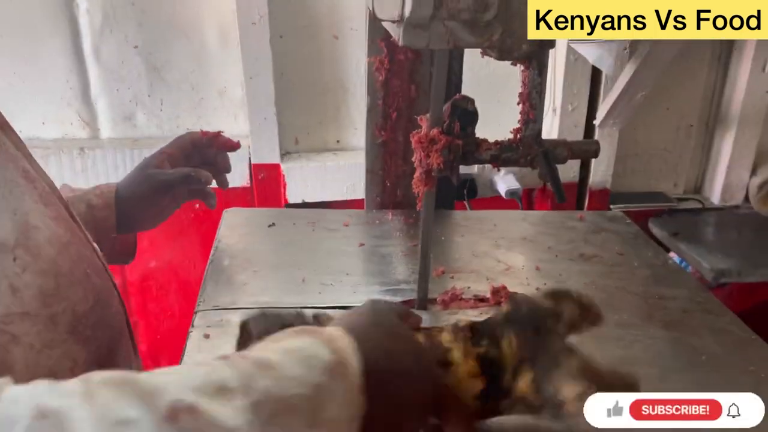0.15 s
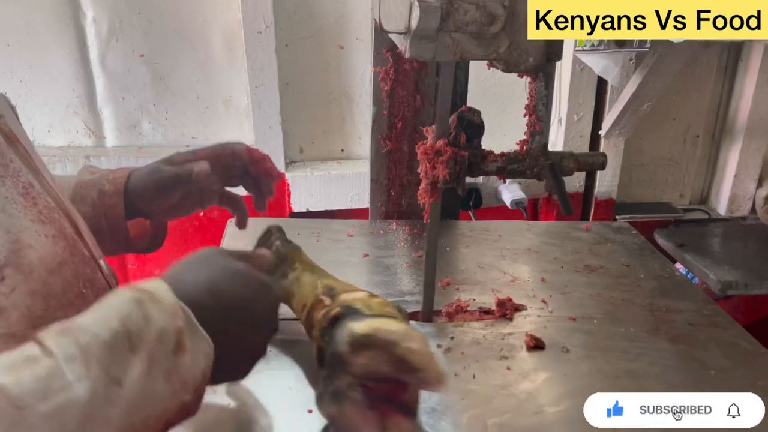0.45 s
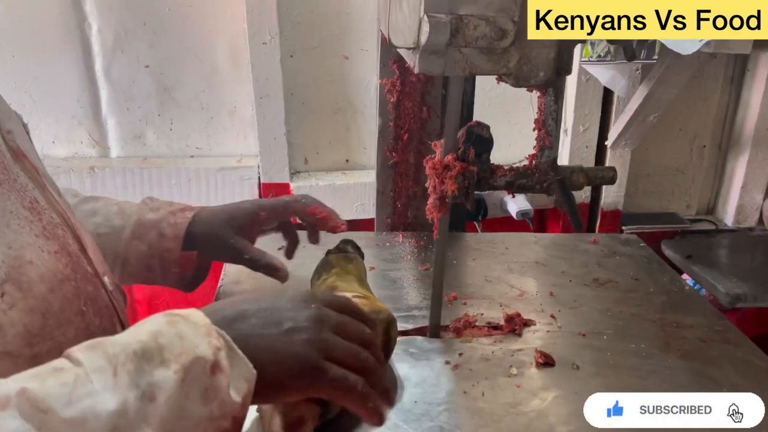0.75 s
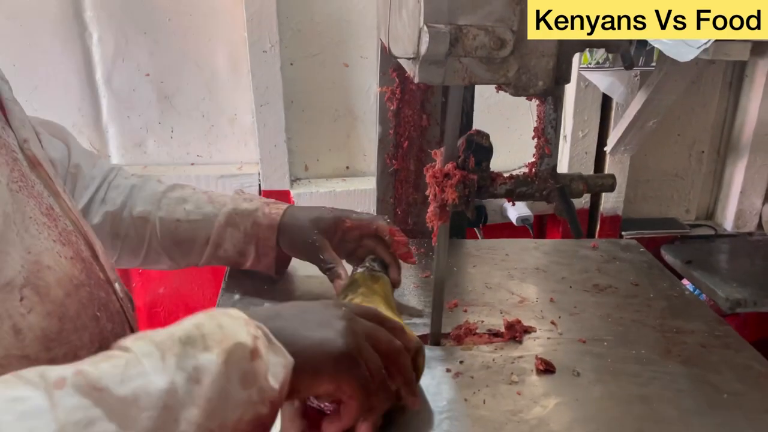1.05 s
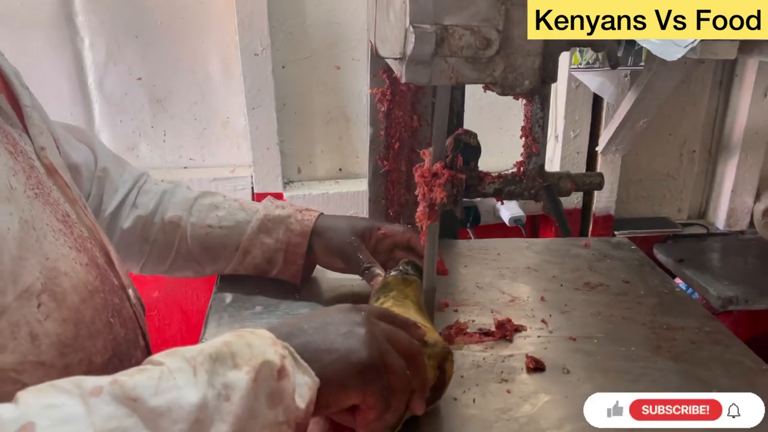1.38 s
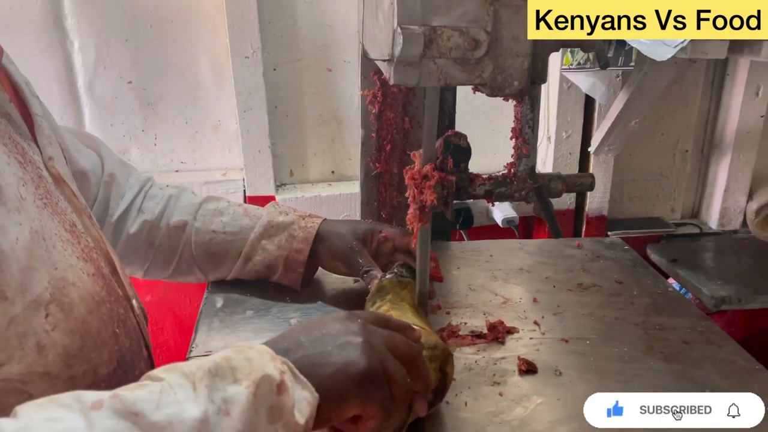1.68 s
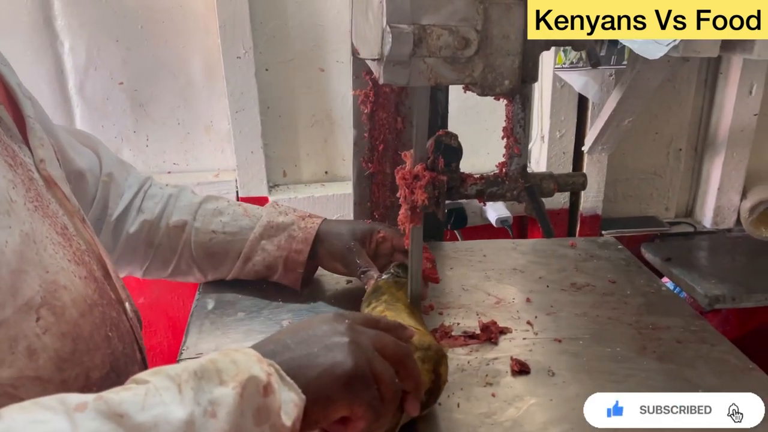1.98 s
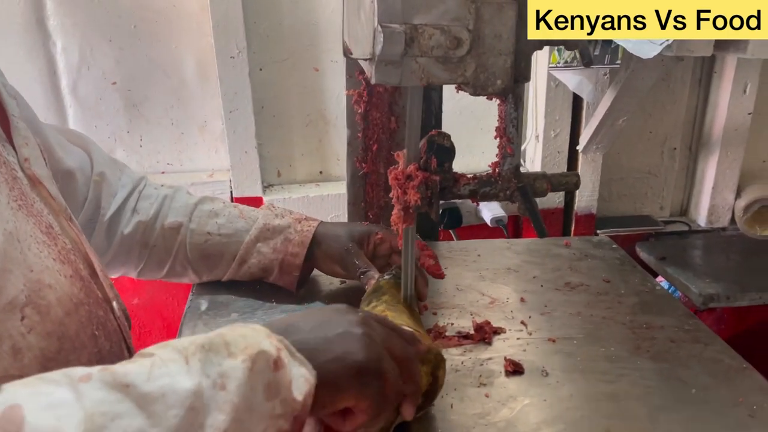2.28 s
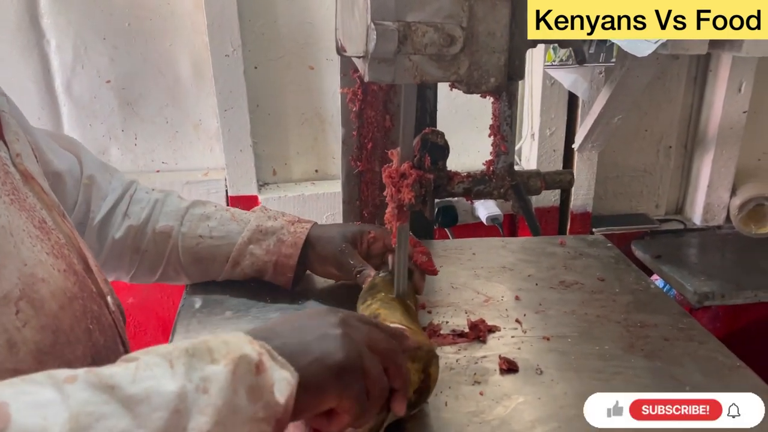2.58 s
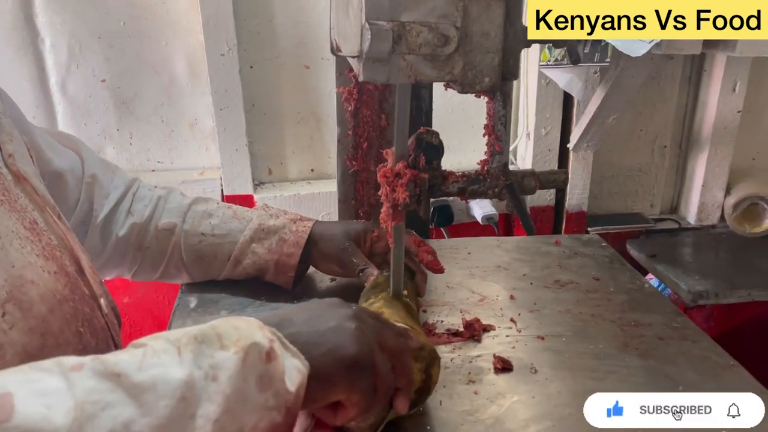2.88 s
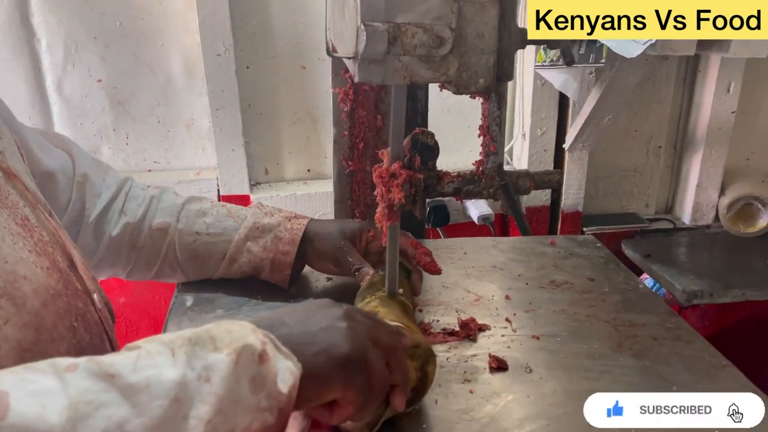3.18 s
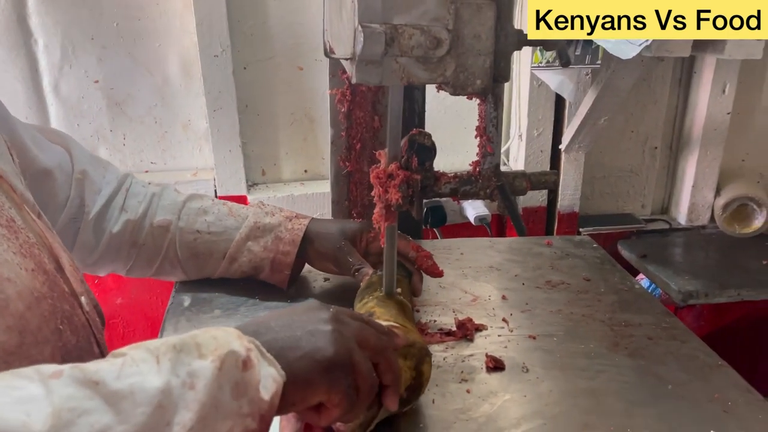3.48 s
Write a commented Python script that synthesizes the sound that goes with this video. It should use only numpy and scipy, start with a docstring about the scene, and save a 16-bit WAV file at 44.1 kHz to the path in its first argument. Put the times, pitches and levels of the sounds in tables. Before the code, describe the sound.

A band saw hums, a meat joint knocks on the steel table, then teeth grind bone

```python
"""Band saw cutting a joint of meat

A butcher's band saw idles in a tiled workshop: steady tones hum, noise through resonances makes the steel
frame rumble, shaped noise whirrs, narrow rings rattle in the guides and tiny clicks sizzle.
A joint knocks on the table, which rings as decaying tones, and is then pushed into the blade:
the teeth sing as an unsteady tone near 900 Hz, dense clicks grind the bone, and resonant noise squeals."""
import sys
import numpy as np
from scipy import signal
from scipy.fft import rfft, irfft
from scipy.io import wavfile

SR = 44100
rng = np.random.default_rng(int(sys.argv[2]) if len(sys.argv) > 2 else 0)


def file_out(sig):
    """Save sig as 16-bit WAV at sys.argv[1]."""
    # one column per channel
    cols = np.atleast_2d(sig).T
    # limit, then scale
    lim = np.clip(cols, -1, 1)
    pcm = np.round(lim * 32767).astype(np.int16)
    wavfile.write(sys.argv[1], SR, pcm)


N = 160965          # length in samples
TOUCH_S = 1.335     # the blade meets the bone


def from_db(db):
    """Turn decibels into a factor for the wave."""
    return 10 ** (np.asarray(db) / 20)


def rms_one(x):
    """Scale a signal to an average strength (RMS) of 1."""
    return x / np.sqrt(np.mean(x ** 2) + 1e-20)


def in_time(rows):
    """Read each column at every sample, with straight lines between the rows."""
    start_s, *columns = np.transpose(rows)
    time_s = np.arange(N) / SR
    return [np.interp(time_s, start_s, column) for column in columns]


def at_hz(rows):
    """Read each column at every FFT bin, on a log frequency axis."""
    pitch_hz, *columns = np.transpose(rows)
    bin_hz = np.arange(N // 2 + 1) * SR / N
    # the extra 1 Hz avoids the log of zero
    return [np.interp(np.log(bin_hz + 1), np.log(pitch_hz), column) for column in columns]


def drift(rate_hz):
    """Slow random wandering of RMS 1, made at every 20th sample by smoothing noise twice."""
    r = np.exp(-2 * np.pi * rate_hz * 20 / SR)
    noise = rng.standard_normal(N // 20 + 3002)
    slow = signal.lfilter([1], [1, -2 * r, r * r], noise)[3000:]  # drop the filter's start
    return np.interp(np.arange(N) / 20, np.arange(len(slow)), rms_one(slow))


def colour(x, spectrum):
    """Shape the spectrum of a signal by a table of levels, then set its RMS to 1."""
    gain = from_db(at_hz(spectrum)[0])
    return rms_one(irfft(rfft(x) * gain, N))


def resonate(peaks, patchy_db):
    """Noise passes twice through each resonance, and each swells on its own."""
    out = 0
    for pitch_hz, width_hz, level_db in peaks:
        r = np.exp(-1.5 * np.pi * width_hz / SR)
        w = 2 * np.pi * pitch_hz / SR
        stage = [(1 - r * r) / 2, 0, (r * r - 1) / 2, 1, -2 * r * np.cos(w), r * r]
        noise = rng.standard_normal((2, N + SR // 4))  # a quarter second to build up, cut off below
        ringing = signal.sosfilt([stage] * 2, noise)[:, -N:]
        out = out + from_db(level_db + patchy_db * drift(5.5)) * ringing
    return rms_one(out)


def grains(per_s, spread_db):
    """Clicks of uneven size and random sign at random moments, shared by both sides."""
    size_db = spread_db * np.minimum(rng.exponential(1, (2, N)), 5)
    sizes = from_db(size_db) * rng.choice([-1, 1], (2, N))
    return sizes * (rng.random(N) < per_s / SR)


def motor_hum(hum_db):
    """The motor hums in steady sine tones that share one changing level."""
    # the hum's tones: pitch_hz [Hz], level_db [dB]
    hum_tones = [(100.6, -2.5), (301.8, -15.5)]
    t = np.arange(N) / SR
    hum = 0
    for pitch_hz, level_db in hum_tones:
        sine = np.sin(2 * np.pi * (pitch_hz * t + rng.random()))
        hum = hum + from_db(level_db + hum_db) * np.sqrt(2) * sine
    return hum


def frame_rumble(swing_db):
    """Noise shakes the resonances of the steel frame and table, swinging along with the hum."""
    # resonances: pitch_hz [Hz], width_hz [Hz], level_db [dB, relative]
    frame = [(67.3, 20.4, 2), (133.9, 8, -2.5), (203, 8.2, -11.5), (231, 4.6, 3.5), (253, 10.2, 2.5),
             (290, 23.4, 5), (305.5, 70, -8.5), (361, 29, -11), (407.3, 19.5, -4), (525, 5.9, -0.5),
             (656.5, 42, -8), (841.5, 39, -13.5), (895.4, 10.8, -1.5), (1217, 8.3, -4.5)]
    rumble_db, follows = -25.5, 1  # level in dB at zero swing; share of the hum's swing
    return from_db(rumble_db + follows * swing_db) * resonate(frame, patchy_db=0.8)


def blade_whirr(swing_db):
    """Wheels and blade whirr as shaped noise; dense tiny clicks add a thin sizzle."""
    # whirr of wheels and blade in the guides: pitch_hz [Hz], level_db [dB per Hz, relative]
    whirr_spectrum = [(40, 0.5), (170, -12), (450, -1.5), (1000, -6.5), (1900, -10), (2850, -17.5),
                      (3400, -18), (6000, -19.5), (7300, -23), (9300, -21.5), (12000, -35)]
    # thin sizzle on top: pitch_hz [Hz], level_db [dB per Hz, relative]
    sizzle_spectrum = [(3000, -48), (7300, -21), (9300, -4), (11100, 4), (12100, -3.5), (13000, -43),
                       (13600, -36), (14500, -45)]
    # sizzle before the cut, at zero swing: start_s [s], level_db [dB]
    idle_sizzle = [(0, -36), (.07, -39), (.2, -40), (.35, -43), (.52, -39), (.65, -36.5), (.88, -35.5),
                   (.95, -38.5), (1.1, -39), (1.36, -40)]
    whirr_db, follows = -27.5, 0.76  # level in dB at zero swing; share of the hum's swing
    noise = rng.standard_normal((2, N)) * from_db(0.7 * drift(9))
    whirr = from_db(whirr_db) * colour(noise, whirr_spectrum)
    clicks = grains(per_s=2300, spread_db=3.0) * from_db(1.4 * drift(31))
    sizzle = from_db(in_time(idle_sizzle)[0]) * colour(clicks, sizzle_spectrum)
    return from_db(follows * swing_db) * (whirr + sizzle)


def blade_whine():
    """The free-running blade whines in one narrow resonance, which fades out just before the bone."""
    whine_hz, width_hz = 3445, 26
    start_db, fade_db_per_s = -45.5, 1.5
    t = np.arange(N) / SR
    free = np.clip((TOUCH_S - t) / 0.054, 0, 1)  # fades over the last 54 ms before the touch
    level = from_db(start_db - fade_db_per_s * t)
    return level * free * resonate([(whine_hz, width_hz, 0)], patchy_db=1.3)


def guides():
    """The blade rattles in its guides: narrow rings that wander in pitch and flicker in level."""
    # rings: pitch_hz [Hz], level_db [dB, relative]
    rings = [(1820, -3), (2010, 3), (2480, -8)]
    # level while the blade runs free: start_s [s], level_db [dB]
    ring_level = [(0, -56), (.3, -39), (.6, -46), (.74, -40), (.88, -45), (1.12, -35), (1.3, -39),
                  (1.4, -64)]
    wander, rattle_db = 0.027, 2  # spread as a share of pitch; spread in dB
    out = 0
    for pitch_hz, level_db in rings:
        phase = 2 * np.pi * np.cumsum(pitch_hz * (1 + wander * drift(1.8))) / SR
        level = from_db(level_db + rattle_db * drift(11))
        # random sine and cosine amounts give each side its own narrow band of noise
        sides = [drift(40) * np.sin(phase) + drift(38) * np.cos(phase) for side in range(2)]
        out = out + level * np.array(sides)
    return from_db(in_time(ring_level)[0]) * rms_one(out)


def idling():
    """Motor, frame, blade and guides together; rumble, whirr and sizzle swing with the hum."""
    # level of the hum, which sinks once the cut has begun: start_s [s], level_db [dB]
    idle_level = [(0.0, -30.5), (0.03, -31.5), (0.59, -29.5), (0.66, -30), (1.33, -27.5), (1.73, -40),
                  (2.68, -39.5), (3.2, -39.5), (3.65, -37.5)]
    hum_db, = in_time(idle_level)
    swing_db = hum_db + 31  # zero at a hum of -31 dB
    return (motor_hum(hum_db) + frame_rumble(swing_db) + blade_whirr(swing_db)
            + blade_whine() + guides())


def knocks():
    """The joint knocks on the steel table; each blow starts decaying tones, softened by a low-pass."""
    # blows: start_s [s], level_db [dB], hard_db [extra dB of the modes above hard_hz]
    blows = [(0.433, -22, -7), (0.505, -32, 20), (0.509, -29, 15), (0.515, -8.5, 1), (0.532, -20, 9.5),
             (0.554, -13.5, -6), (0.623, -14.5, -5), (1.412, -14.5, -1), (1.442, -22, 19)]
    # ringing modes: pitch_hz [Hz], level_db [dB, relative], t60_s [s to fall by 60 dB]
    table_modes = [(74, 2, 0.13), (238.7, -5, 0.15), (300, -8, 0.12), (538, -13, 0.12), (764, -11, 0.04),
                   (1240, -8, 0.022), (1890, -9, 0.012), (2450, -10, 0.01)]
    hard_hz, contact_hz = 700, 1200  # upper modes start here; low-pass of the soft contact
    spread_db = 1.2  # chance in each mode, blow and side
    start_s, blow_db, hard_db = np.transpose(blows)
    at = (start_s * SR).astype(int)
    out = 0
    for pitch_hz, level_db, t60_s in table_modes:
        chance_db = rng.normal(0, spread_db, (len(at), 2)).T
        clicks = np.full((2, N), 1e-18)  # inaudible, keeps the filter away from tiny numbers
        clicks[:, at] = from_db(blow_db + level_db + hard_db * (pitch_hz > hard_hz) + chance_db)
        r = from_db(-60 / (t60_s * SR))
        w = 2 * np.pi * pitch_hz / SR
        out = out + signal.lfilter([0, np.sin(w)], [1, -2 * r * np.cos(w), r * r], clicks)
    return signal.sosfilt(signal.butter(1, contact_hz, fs=SR, output="sos"), out)


def tooth_tone():
    """Teeth pass the bone at an unsteady rate and sing; the overtone grows faster than the tone."""
    # level of the tone: start_s [s], level_db [dB]
    tone_level = [(1.38, -48), (1.44, -20), (1.505, -17.5), (1.53, -22), (1.57, -20.5), (1.6, -23),
                  (1.65, -15), (1.71, -20.5), (1.79, -15), (1.93, -24.5), (1.96, -37), (2.0, -15),
                  (2.15, -24.5), (2.18, -17), (2.22, -26), (2.3, -17), (2.32, -50), (2.35, -22.5),
                  (2.5, -30), (2.62, -35), (2.66, -48), (2.71, -29), (2.79, -34.5), (2.82, -26),
                  (2.88, -29.5), (2.94, -23.5), (3.04, -31.5), (3.1, -30), (3.14, -41), (3.17, -34),
                  (3.2, -51), (3.23, -32), (3.35, -48), (3.37, -36), (3.42, -29), (3.46, -41), (3.57, -27),
                  (3.62, -34)]
    # rate at which the teeth pass: start_s [s], pitch_hz [Hz]
    tooth_rate = [(1.4, 959), (1.55, 938.5), (1.68, 907.6), (1.8, 939), (1.93, 936), (2.0, 920.7),
                  (2.15, 928), (2.28, 935), (2.45, 913), (2.9, 915.5), (3.65, 912.6)]
    # multiples 1, 2 of the tooth rate: level_db [dB, relative]
    multiples = [0.1, -11]
    jitter_hz, flutter_db = 14, 2.4  # spread of the rate and of the level
    follow, follow_from_db = 0.18, -16  # extra overtone dB per dB of tone, counted from this level
    tone_db, = in_time(tone_level)
    rate_hz, = in_time(tooth_rate)
    sides = []
    for side in range(2):
        phase = 2 * np.pi * np.cumsum(rate_hz + jitter_hz * drift(43.9)) / SR
        flutter = from_db(flutter_db * drift(34))
        tone = 0
        for k, level_db in enumerate(multiples):
            level = from_db(level_db + k * follow * (tone_db - follow_from_db))
            tone = tone + level * flutter ** (1 + 0.3 * k) * np.sin((k + 1) * phase)
        sides.append(rms_one(tone))
    return from_db(tone_db) * np.array(sides)


def bone_grinding():
    """Chips torn off the bone are dense clicks that grind and sizzle; blade noise and a squeal ring."""
    # pressure on the blade: start_s [s], grind_db [treble, dB], sizzle_db [dB], squeal_db [upper ring, dB]
    bite = [(1.347, -47, -27.5, -47), (1.375, -40, -34, -41), (1.39, -34.5, -24, -36),
            (1.44, -24.5, -21, -26), (1.475, -29.5, -20, -26), (1.52, -33.5, -30, -26.5),
            (1.58, -34, -21.5, -29.5), (1.64, -28, -20.5, -30), (1.7, -36, -25, -30),
            (1.73, -31.5, -20.5, -36), (1.81, -32.5, -28, -27), (1.83, -34, -27, -36),
            (1.89, -32.5, -23.5, -28.5), (1.95, -37, -29, -36), (2.01, -30, -23.5, -38),
            (2.06, -31, -22.5, -40), (2.1, -33.5, -27, -33), (2.13, -32.5, -20.5, -28),
            (2.15, -37, -29.5, -34), (2.18, -31.5, -26.5, -30.5), (2.27, -38.5, -29, -32.5),
            (2.33, -33, -27, -34), (2.34, -28.5, -19.5, -39), (2.37, -32.5, -30, -29.5),
            (2.42, -36.5, -29, -38), (2.45, -40.5, -37, -31), (2.5, -42.5, -36, -37),
            (2.58, -42.5, -39, -33), (2.7, -39, -28, -35.5), (2.74, -37.5, -35.5, -30),
            (2.92, -45, -38, -34.5), (2.95, -39, -33, -35), (2.98, -42, -41.5, -33.5),
            (3.17, -56.5, -42.5, -39), (3.31, -64, -43, -41.5), (3.34, -61, -46, -33.5),
            (3.52, -50, -41, -37), (3.6, -48, -42, -37)]
    # colour of the grinding: pitch_hz [Hz], level_db [dB per Hz, relative]
    grind_spectrum = [(170, -21.5), (300, -4.5), (500, -4), (1100, -3), (1600, -3), (2100, -5.5),
                      (2700, -8), (3100, -9), (4300, -14.5), (5600, -10), (7300, -14.5), (9300, -16),
                      (12000, -23.5)]
    # thin sizzle on top: pitch_hz [Hz], level_db [dB per Hz, relative]
    sizzle_spectrum = [(3000, -48), (7300, -21), (9300, -4), (11100, 4), (12100, -3.5), (13000, -43),
                       (13600, -36), (14500, -45)]
    # resonances of the blade: pitch_hz [Hz], width_hz [Hz], level_db [dB, relative]
    blade_modes = [(76, 9, 0), (253.6, 17.3, 0.5), (309.8, 21, 3), (530, 14.6, -1), (714, 55, -7),
                   (845, 79, -5.5), (981, 95, -3.5), (1228, 55, -5.5), (1518, 50, -8), (1912, 31, -9.5)]
    # upper ring: pitch_hz [Hz], width_hz [Hz], level_db [dB, relative]
    squeal_modes = [(2331, 34, 6), (2428, 50, 7), (2498, 54, 8), (2936, 79, -3), (3190, 120, -6)]
    whole_db = 9  # whole grinding over its treble
    blade_db, blade_follows = -27.5, 0.31  # at -38 dB of grinding treble; share of its swing
    grind_db, sizzle_db, squeal_db = in_time(bite)
    rasp = from_db(1.5 * drift(13))  # bursts shared by grinding and sizzle
    chips = grains(per_s=14000, spread_db=3.5) * rasp * from_db(1.65 * drift(15))
    grind = from_db(grind_db + whole_db) * colour(chips, grind_spectrum)
    specks = grains(per_s=10000, spread_db=3.5) * rasp * from_db(1.0 * drift(48))
    sizzle = from_db(sizzle_db) * colour(specks, sizzle_spectrum)
    blade = from_db(blade_db + blade_follows * (grind_db + 38)) * resonate(blade_modes, patchy_db=1.03)
    squeal = from_db(squeal_db) * resonate(squeal_modes, patchy_db=0.8)
    return grind + sizzle + blade + squeal


def cutting():
    """Tooth tone and grinding together, heard only from the moment the blade meets the bone."""
    touching = np.clip((np.arange(N) / SR - TOUCH_S) / 0.012, 0, 1)  # sets in over 12 ms
    return touching * (tooth_tone() + bone_grinding())


def scene():
    """Add up all sources on two sides: noise differs between them, the hum is alike."""
    return idling() + knocks() + cutting()


def record(dry):
    """The right port hears part of what the left hears, turned in phase; peaks are rounded, both ends cut."""
    # the two microphone ports: pitch_hz [Hz], alike [0-1], turn [radians, right leads],
    # balance_db [left minus right, dB]
    ports = [(60, .985, 0, 0), (130, .97, 0, 1), (260, .9, -.2, -1), (550, .8, -.3, 0), (1100, .55, .1, 2),
             (1700, .3, -1, 2.5), (2400, .3, -1, .5), (3800, .4, -.7, 2), (5200, .12, -2, 5),
             (6500, .38, -.5, 2.5), (7300, .25, -2, 0), (7900, .45, -.4, 1), (8700, .9, .1, .5),
             (9300, .9, 1.5, 0), (9800, .97, 2.8, 0), (10220, 1, 3.14, 0), (10500, .97, 3.5, 0),
             (11400, .92, 5.1, 0), (11800, .99, 6.1, 0), (12300, 1, 6.3, 0), (12500, .75, 6.6, 0),
             (13000, .7, 7.8, 0), (13600, .97, 9.4, 0)]
    low_cut_hz, cutoff_hz = 63.6, 15600
    alike, turn, balance_db = at_hz(ports)
    alike = np.clip(alike, 0, 1)
    near, far = rfft(dry)
    right = alike * np.exp(1j * turn) * near + np.sqrt(1 - alike ** 2) * far
    spectra = np.array([near * from_db(balance_db / 2), right * from_db(-balance_db / 2)])
    pair = irfft(spectra, N)
    pair = signal.sosfilt(signal.butter(4, low_cut_hz, "high", fs=SR, output="sos"), pair)
    pair = 1.3 * np.tanh(pair / 1.3)  # rounds the peaks
    return signal.sosfilt(signal.cheby2(12, 70, cutoff_hz, fs=SR, output="sos"), pair)


dry = scene()
out = record(dry)
file_out(out)
```